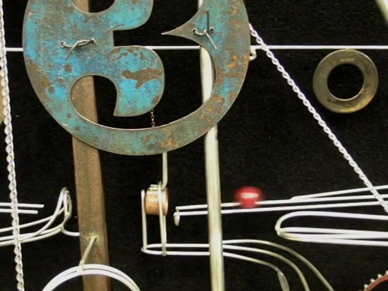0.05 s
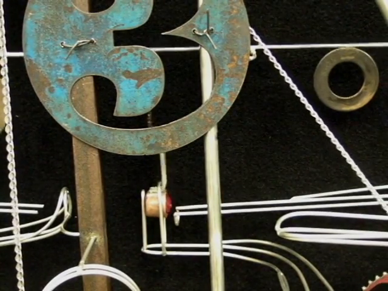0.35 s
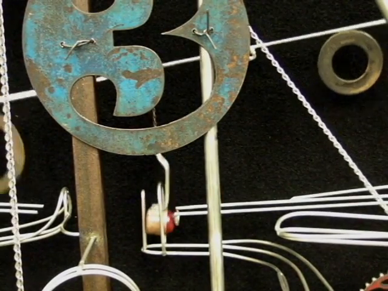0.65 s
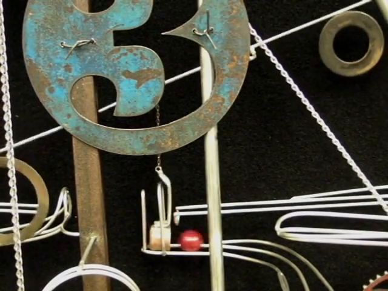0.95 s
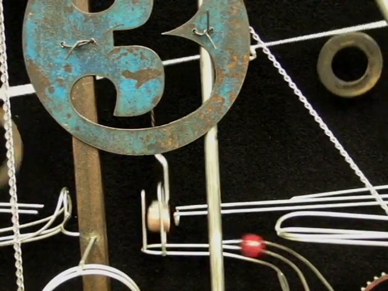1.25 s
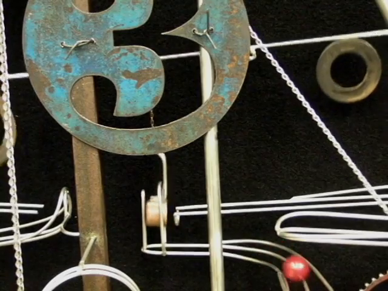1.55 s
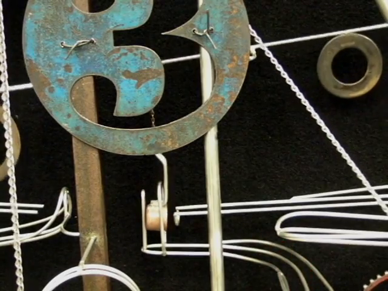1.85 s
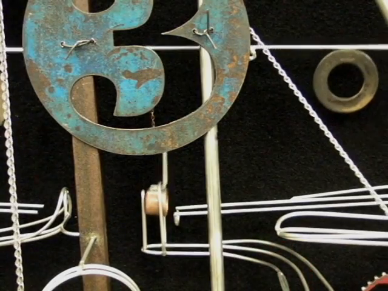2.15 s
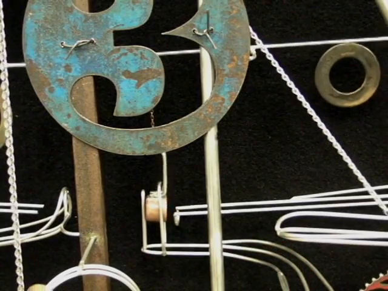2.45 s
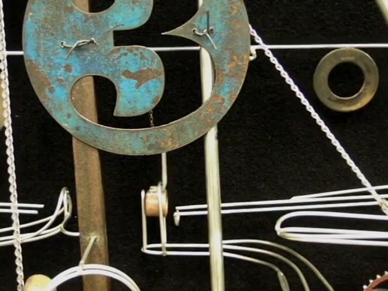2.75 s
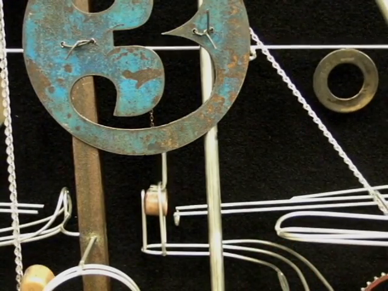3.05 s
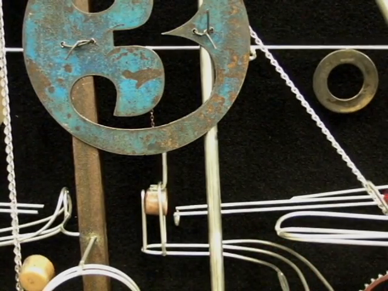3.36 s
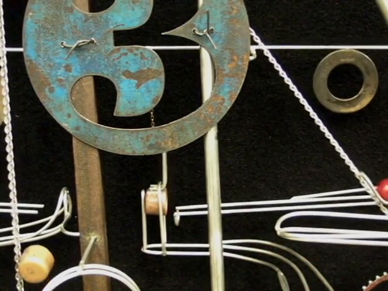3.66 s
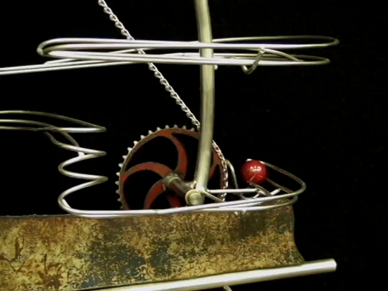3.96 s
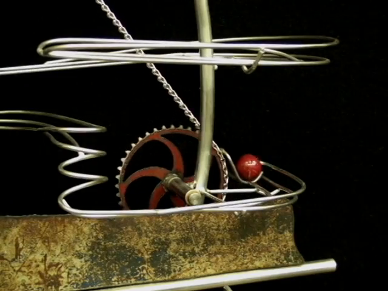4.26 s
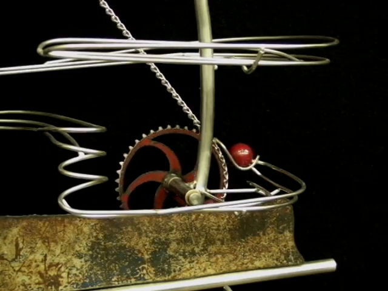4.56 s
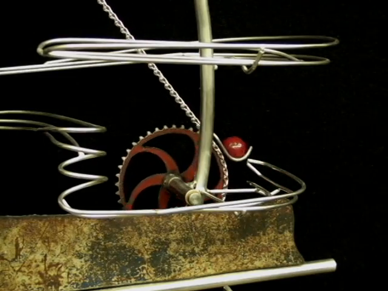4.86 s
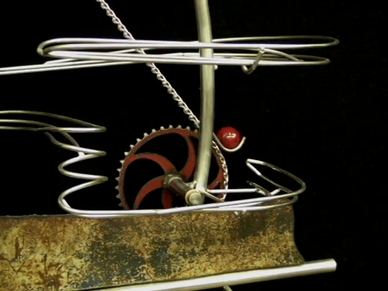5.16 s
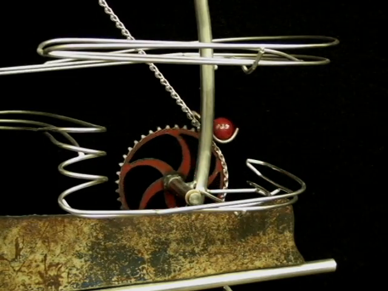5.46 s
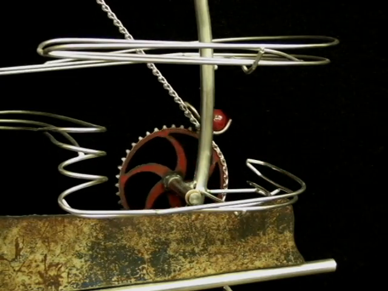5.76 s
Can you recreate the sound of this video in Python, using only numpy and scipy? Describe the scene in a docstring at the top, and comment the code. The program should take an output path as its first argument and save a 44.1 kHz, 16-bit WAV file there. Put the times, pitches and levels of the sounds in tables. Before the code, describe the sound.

From the start, balls roll along the welded wire rails of a sculpture, close to a stereo microphone indoors, making a continuous metallic rustle. Irregular knocks and rattles come several times a second, each chattering briefly and setting the frame ringing brightly. Sharp little clicks and wire clinks are mixed in, and a soft low growl swells as balls pass through bends. Stronger knocks fall near 0.6 seconds, in a busy cluster from 1.8 to 2.6, and again between 3.1 and 3.8.

At about 3.9 seconds the near tracks fall quiet, leaving softer rolling farther away. A chain lift adds light taps, clicks and short jangles at around 4.1, 4.7 and 5.1 seconds, with the clearest at 5.5. The distant rolling grows slightly toward the end, near 5.8 seconds. A faint, low motor hum and soft room tone run underneath throughout.

```python
"""Balls knock and rattle along the welded wire rails of a rolling-ball sculpture, indoors, close to a
stereo microphone. Each knock makes ball and rails chatter and sets the whole frame ringing; the ball
then rocks and rustles on until it settles. About four seconds in, the near tracks fall quiet and a
chain lift carries one ball up amid a few clicks and jangles, while others roll farther off.
A motor hums underneath, over soft room tone."""
import sys
import numpy as np
from scipy import signal
from scipy.fft import rfft, irfft, next_fast_len
from scipy.io import wavfile
from scipy.ndimage import uniform_filter1d

SR = 44100
rng = np.random.default_rng(int(sys.argv[2]) if len(sys.argv) > 2 else 0)


def master_out(mix):
    """Clip the mix to full scale and print it as 16-bit PCM to the path in sys.argv[1]."""
    frames = np.transpose(np.atleast_2d(mix))
    ceiling = np.clip(frames, -1, 1)
    pcm = np.round(ceiling * 32767).astype(np.int16)
    wavfile.write(sys.argv[1], SR, pcm)


N = 256220
TIME = np.arange(N) / SR

# Levels and gains are relative within each table.
# balls striking the rails by the microphone: start_s, level_db, chatter_s, tilt_db_per_octave
BALL_KNOCKS = [(0.059, -25, 0.021, 1), (0.334, -23.5, 0.052, 0.5), (0.374, -21.5, 0.13, 2),
               (0.6025, -18, 0.18, 1.5), (0.693, -22.5, 0.17, 3), (0.951, -18.5, 0.063, 1.5),
               (1.316, -23, 0.097, 1.5), (1.8097, -17, 0.15, 2.5), (1.892, -21, 0.33, 1),
               (2.176, -20.5, 0.017, 0), (2.35, -25, 0.035, 2), (2.3892, -18, 0.081, 0),
               (2.511, -25.5, 0.095, 1), (2.564, -20, 0.035, 0), (3.1462, -18.5, 0.16, 0),
               (3.338, -18.5, 0.14, 1), (3.51, -24.5, 0.053, 5), (3.7703, -17, 0.091, 0)]
# balls juddering between the rails without a blow: start_s, level_db, chatter_s, tilt_db_per_octave
BALL_RATTLES = [(0.425, -20.5, 0.09, -1), (0.457, -24, 0.25, 2), (0.822, -19.5, 0.061, 3),
                (1.153, -31, 0.038, -5.5), (1.244, -34.5, 0.23, -3.5), (1.449, -20, 0.048, 0.5),
                (1.63, -32, 0.11, -1.5), (2.044, -20, 0.17, 0.5), (2.302, -26, 0.12, -1),
                (2.71, -24, 0.045, 3), (2.818, -19.5, 0.15, 1), (3.045, -32.5, 0.16, 5),
                (3.474, -17, 0.056, -1.5), (3.675, -30, 0.13, -1)]
# jangles of the chain lift: start_s, level_db, chatter_s, tilt_db_per_octave
CHAIN_JANGLES = [(4.102, -26.5, 0.11, -8), (4.145, -26.5, 0.048, -4), (4.714, -33, 0.021, -4),
                 (5.061, -27.5, 0.07, -6), (5.074, -26, 0.08, -2.5), (5.476, -19.5, 0.051, -2.5)]
# dry clicks of balls and levers, clinks of single wires nearby: start_s, level_db, pitch_hz, t60_s
CLICKS_AND_CLINKS = [(0.3369, -8.5, 9800, 0.0039), (0.375, -8.5, 2900, 0.019), (0.376, -26, 10760, 0.2),
                     (0.6005, -11, 6000, .006), (0.832, -26.5, 3056, 0.4), (1.46, -23, 4020, .08),
                     (1.8142, -9, 5100, 0.029), (1.898, -17, 7050, 0.19), (2.0226, -4, 7900, 0.007),
                     (2.056, -5, 7240, 0.023), (2.065, -6.5, 2640, 0.0082), (2.5651, -10.5, 2870, 0.037),
                     (3.507, -11, 3170, 0.0052), (3.772, -9, 5600, .006), (4.1465, -5, 2600, 0.0053),
                     (4.7027, -19.5, 8500, 0.017), (4.719, -26, 5600, 0.011), (4.8863, -31, 8800, 0.02),
                     (5.48, -22, 10200, .03), (5.492, -30.5, 1700, 0.26), (5.569, -17, 4730, 0.012)]
# soft dry taps in the mechanism: start_s, level_db
SOFT_TAPS = [(1.7029, -33), (3.0359, -34), (4.3855, -31.5), (4.5863, -38), (4.903, -37.5), (5.0533, -36.5)]
# modes of the tapped part: pitch_hz, t60_s
TAPPED_PART_MODES = [(735, .022), (815, .036)]
# balls sweeping through bends: centre_s, level_db, half_length_s, strongest_mode_hz
BEND_PASSES = [(0.483, -40, 0.14, 444), (0.78, -43, 0.058, 420), (1.02, -42.5, 0.051, 567),
               (2.097, -40, 0.13, 411), (2.902, -36.5, 0.083, 424), (3.403, -42.5, 0.13, 420)]
# low modes of the curved rails: pitch_hz, level_db
CURVED_RAIL_MODES = [(273, -5), (368, -6), (418, -2), (555, -2)]
# steady rolling close by, louder on the slopes and fainter after each drop: time_s, level_db
NEAR_ROLL_LEVELS = [(0, -27.5), (.25, -33), (.8, -29.5), (1.1, -38), (1.55, -33.5), (2.1, -31.5), (3, -32),
                    (3.25, -27.5), (3.9, -35)]
# rolling farther off: time_s, level_db
FAR_ROLL_LEVELS = [(3.9, -39.5), (4.65, -42.5), (5.4, -35), (5.81, -34)]
# tones of the motor: pitch_hz, level_db
MOTOR_TONES = [(360.5, -62.5), (419.9, -62.5)]

# ring time of the frame: band_centre_hz, t60_s
FRAME_DECAY = [(400, 0.7), (2500, 0.34), (7000, 0.22), (13000, 0.16)]
# modes of the near frame; negative gains are dead gaps between them: pitch_hz, gain_db
NEAR_FRAME_MODES = [(418, 6), (1665, 9), (1892, 9), (2121, 8), (2277, 7), (2400, -5), (2514, 7), (3015, 5),
                    (3064, 8), (3115, 4), (3550, -5), (3765, 6), (3960, 5), (4260, -6), (4959, 5),
                    (5066, 5), (6476, 5), (7138, 7), (7289, 6), (7489, 7), (7652, 7), (8220, 6), (10309, 5)]
# modes and dead gaps of the far tracks and the lift: pitch_hz, gain_db
FAR_FRAME_MODES = [(418, 5), (1660, 6), (1905, 7), (2055, 6), (2130, 7), (2320, 7), (2410, -7), (3050, 8),
                   (3305, 7), (4180, 4), (4400, -6), (4575, 7), (4680, 5), (4850, -5), (12850, 8)]
# spectrum of a close knock: frequency_hz, gain_db
KNOCK_SPECTRUM = [(100, -36), (290, -26.5), (420, -18.5), (750, -20.5), (1450, -16.5), (1750, -6),
                  (3000, -3), (7500, 0), (10500, -4.5), (12000, -13), (14800, -12.5)]
# spectrum of close rolling: frequency_hz, gain_db
NEAR_ROLL_SPECTRUM = [(50, -38), (100, -23), (140, -5), (280, -19), (420, -9), (700, -10), (1450, -13.5),
                      (1750, -5), (3100, 2), (7500, 4), (10500, -4.5), (12000, -11.5), (15000, -18)]
# spectrum of the chain's jangle: frequency_hz, gain_db
JANGLE_SPECTRUM = [(100, -33), (650, -17.5), (1350, -23), (1700, -8), (5500, 9.5), (8500, 11.5), (12000, 3),
                   (14500, 5)]
# spectrum of distant rolling: frequency_hz, gain_db
FAR_ROLL_SPECTRUM = [(60, -31), (140, -2), (280, -23.5), (420, -8), (700, -7), (1400, -11.5), (1700, -2.5),
                     (3100, 1), (7500, 1), (10500, -12.5), (15000, -20)]
# spectrum of the room tone: frequency_hz, gain_db
ROOM_SPECTRUM = [(20, -55), (45, -11), (90, 6.5), (140, 8.5), (270, 3.5), (420, 5.5), (800, -1), (1400, -2),
                 (8000, -10.5), (15000, -34)]

# left-right likeness of knocks, jangles and click reflections: frequency_hz, correlation
CONTACT_COHERENCE = [(3000, 0.98), (4700, 0.8), (6500, 0.21), (12000, 0.052)]
# left-right likeness of close rolling: frequency_hz, correlation
NEAR_ROLL_COHERENCE = [(4000, 0.84), (6800, 0.048)]
# left-right likeness of the far tracks and the room: frequency_hz, correlation
FAR_COHERENCE = [(50, 0.99), (150, 0.67), (2400, 0.89), (4400, 1), (8000, 0.14)]
# balance of the microphone pair: frequency_hz, left_minus_right_db
MIC_BALANCE = [(2000, -0.3), (5800, -2), (7700, 9), (9500, 3.5), (14000, 3.5)]

NEAR_WIDTH_HZ, FAR_WIDTH_HZ, WIRE_WIDTH_HZ, GAP_WIDTH_HZ = 23, 32, 70, 130  # base widths of modes, gaps
LIFT_S, HANDOVER_S = 3.91, 0.075  # middle and length of the fade from near to far rolling


def knocks_and_rattles():
    """Close to the microphone, balls strike the rails or judder between them, and the frame rings."""
    knocks = clatter(BALL_KNOCKS, chatter_db=2.5, blow_db=28.0)
    rattles = clatter(BALL_RATTLES, chatter_db=4.5, rise_s=0.0034)
    return colour(knocks + rattles, KNOCK_SPECTRUM, NEAR_FRAME_MODES)


def clatter(events, chatter_db, blow_db=None, rise_s=None, clink_db=12.5, wire_count=3, size=32768):
    """Dying rebounds between a few wires, rung out by the frame; they start with a blow or build up."""
    out, hz, t = np.zeros((2, N)), freqs(size), TIME[:size // 2]
    whole_frame, shared_power = evened(frame_ring(CONTACT_COHERENCE)), 0.26
    octaves = np.log2(np.clip(hz, 1500, 12000) / 5500)
    # bending waves run faster at high pitch: treble arrives first, mids a few milliseconds later
    lag_s = .003 * (np.sqrt(9000 / np.clip(hz, 500, 9000)) - 1)
    dispersion = np.exp(-2j * np.pi * np.cumsum(lag_s) * SR / size)
    for start_s, level_db, chatter_s, tilt_db in events:
        rebound = np.maximum(1 - t / chatter_s, 0)  # a bouncing ball loses speed evenly
        landing, pressure = landings(t)
        force = undb(chatter_db) * impacts(len(t), per_s=900, spread_db=1.0) * rebound * pressure
        if rise_s:
            force = force * (1 - np.exp(-t / rise_s))
        if blow_db:
            force[0] = undb(blow_db)
        # every spot on the rails wakes partly the same modes and partly its own
        this_spot = frame_ring(CONTACT_COHERENCE)
        ring = np.sqrt(shared_power) * whole_frame + np.sqrt(1 - shared_power) * this_spot
        # the ball lands on each wire in turn, and each has 14 modes of its own: pitch_hz, gain_db
        wires = rng.uniform((5200, 2), (14000, clink_db), size=(wire_count, 14, 2))
        clinks = 0
        for k, modes in enumerate(wires):
            wire_force = force * (landing % wire_count == k)
            clinks = clinks + rfft(wire_force, size) * unit(resonances(hz, modes, WIRE_WIDTH_HZ))
        gain = undb(level_db + tilt_db * octaves)
        add(out, start_s, irfft(clinks * rfft(ring, size) * gain * dispersion))
    return out


def landings(t, bounce_s=.016, contact_s=.004):
    """A ball lands at uneven intervals: which landing each moment belongs to, and how hard it presses."""
    landing_s = np.r_[0, np.cumsum(rng.uniform(.5, 2, size=64)) * bounce_s]
    landing = np.searchsorted(landing_s, t, side="right") - 1
    pressure = unit(.5 + np.exp(-(t - landing_s[landing]) / contact_s))
    return landing, pressure


def impacts(size, per_s, spread_db):
    """Tiny random contacts of uneven strength, rms 1."""
    strength = undb(spread_db * np.clip(rng.standard_normal(size), -2, 2))
    direction = rng.choice([-1, 1], size)
    touching = rng.random(size) < per_s / SR
    return unit(strength * direction * touching)


def frame_ring(coherence, strike_db=-5, spread_s=0.0094, size=16384):
    """The countless weak modes of the frame as fading noise; the treble dies first."""
    noise, t, ring = rfft(stereo_noise(size, coherence)), TIME[:size], 0
    centres_hz, t60s = np.transpose(FRAME_DECAY)
    for t60_s, weights in zip(t60s, np.eye(len(FRAME_DECAY))):
        band = irfft(noise * log_interp(np.c_[centres_hz, weights], freqs(size)))
        ring = ring + band * decay(t, t60_s)
    # a contact is sharpest before it has spread through the frame
    ring = ring * (1 + undb(strike_db) * np.exp(-t / spread_s))
    return ring / np.sqrt(np.sum(ring ** 2) / 2)


def evened(ring, width_hz=60):
    """Smooth the spectrum of a ring, so that the frame's strong modes stand out clearly on it."""
    size = 2 * ring.shape[1]
    spectrum = rfft(ring, size)
    power = uniform_filter1d(np.mean(np.abs(spectrum) ** 2, axis=0), int(width_hz * size / SR) + 1)
    slope = unit(np.sqrt(log_interp(FRAME_DECAY, freqs(size))))  # longer ringing holds more energy
    return irfft(spectrum / np.sqrt(power) * slope)[:, :size // 2]


def near_rolling(rock_db=-5, rock_peak_s=0.068):
    """Balls roll past the microphone; the rustle swells while one rocks with the energy of a knock."""
    power = undb(np.interp(TIME, *np.transpose(NEAR_ROLL_LEVELS))) ** 2
    for start_s, level_db, chatter_s, _ in BALL_KNOCKS:
        age = np.maximum(TIME - start_s, 0) / rock_peak_s
        swell = age ** 2 * np.exp(1 - age ** 2)
        power = power + undb(level_db + rock_db) ** 2 * chatter_s * swell
    rustle = rolling(np.sqrt(power) * near_share(), NEAR_ROLL_COHERENCE)
    return undb(4.0) * colour(rustle, NEAR_ROLL_SPECTRUM, NEAR_FRAME_MODES)


def rolling(strength, coherence):
    """Balls bump over the grain of the wire and keep the frame rustling."""
    ring = evened(frame_ring(coherence))
    strength = np.pad(strength, (ring.shape[1] - 1, 0), mode="edge")  # already under way at the start
    force = impacts(len(strength), per_s=420, spread_db=3.5) * strength
    return signal.fftconvolve(force[None], ring, mode="valid", axes=1)


def near_share():
    """Share of the near tracks in the rolling: 1 at first, 0 once the lift takes over."""
    return np.clip(.5 + (LIFT_S - TIME) / HANDOVER_S, 0, 1)


def bends(waver_hz=13):
    """Pressed into a curve, a ball growls and makes the rails' low modes hum, one above the rest."""
    hum = unit(sum(undb(db) * noise_tone(hz, waver_hz) for hz, db in CURVED_RAIL_MODES))
    growl = undb(-11.5) * noise_tone(pitch_hz=420, width_hz=370)
    out = np.zeros(N)
    for centre_s, level_db, half_length_s, strongest_hz in BEND_PASSES:
        swell = np.exp(-((TIME - centre_s) / half_length_s) ** 2)
        out += undb(level_db) * swell * unit(hum + growl + noise_tone(strongest_hz, waver_hz))
    return out


def clicks_and_taps(tap_cutoff_hz=1100):
    """Balls and levers click, single wires clink, and soft contacts tap with little treble."""
    out = np.zeros((2, N))
    for start_s, level_db, pitch_hz, t60_s in CLICKS_AND_CLINKS:
        add(out, start_s, undb(level_db) * ping(pitch_hz, t60_s, echo_db=-8, echo_t60_s=0.19))
    soft_contact = signal.butter(2, tap_cutoff_hz, fs=SR)
    for start_s, level_db in SOFT_TAPS:
        tap = sum(ping(hz, t60_s, echo_db=-7, echo_t60_s=0.1) for hz, t60_s in TAPPED_PART_MODES)
        add(out, start_s, undb(level_db) * signal.lfilter(*soft_contact, tap))
    return out


def ping(pitch_hz, t60_s, echo_db, echo_t60_s, size=16384):
    """One damped mode of a small part, with a short spray of reflections around its pitch."""
    t = TIME[:size]
    direct = np.sin(2 * np.pi * pitch_hz * t) * decay(t, t60_s)
    spray = stereo_noise(size, CONTACT_COHERENCE) * decay(t, echo_t60_s)
    echo = signal.lfilter(*signal.iirpeak(pitch_hz, Q=2, fs=SR), spray)
    # small parts radiate no bass
    low_cut = signal.butter(2, pitch_hz * 2 / 3, btype="high", fs=SR, output="sos")
    return signal.sosfilt(low_cut, direct + undb(echo_db) * unit(echo) * np.std(direct))


def chain_lift():
    """The chain jangles in short bursts as it carries a ball up."""
    jangles = clatter(CHAIN_JANGLES, chatter_db=6.5, rise_s=0.0013, clink_db=7)
    return colour(jangles, JANGLE_SPECTRUM, FAR_FRAME_MODES, FAR_WIDTH_HZ) * panned(-1.2)[:, None]


def far_rolling():
    """Balls rustle along the tracks farther from the microphone once the near ones fall quiet."""
    level_db = 0.5 + np.interp(TIME, *np.transpose(FAR_ROLL_LEVELS))
    rustle = rolling(undb(level_db) * (1 - near_share()), FAR_COHERENCE)
    return colour(rustle, FAR_ROLL_SPECTRUM, FAR_FRAME_MODES, FAR_WIDTH_HZ)


def motor_hum():
    """The motor keeps two low, wavering tones sounding."""
    return sum(undb(db) * noise_tone(hz, width_hz=3) for hz, db in MOTOR_TONES)


def room_tone():
    """The soft, low noise of the room."""
    return undb(-52.0) * colour(stereo_noise(N, FAR_COHERENCE), ROOM_SPECTRUM)


def noise_tone(pitch_hz, width_hz):
    """A resonance kept sounding by a ball or the motor, rms 1: wavering if narrow, a growl if wide."""
    band = 1 / (1 + ((freqs(N) - pitch_hz) / width_hz) ** 4)
    return unit(irfft(band * rfft(rng.standard_normal(N)), N))


def resonances(hz, modes, width_hz, q=500):
    """Response of narrow resonances and wider gaps in a flat spectrum; higher modes die sooner."""
    response = 1
    for pitch_hz, gain_db in modes:
        bandwidth_hz = width_hz + pitch_hz / q if gain_db > 0 else GAP_WIDTH_HZ
        response = response + (undb(gain_db) - 1) / (1 + 2j * (hz - pitch_hz) / bandwidth_hz)
    return response


def colour(x, spectrum, modes=(), width_hz=NEAR_WIDTH_HZ):
    """Causal filter of unit power gain: a broad spectrum with narrow resonances on top."""
    size = 2 * next_fast_len(N // 2 + SR // 4)
    cepstrum = irfft(np.log(undb(log_interp(spectrum, freqs(size)))))
    cepstrum[1:size // 2] *= 2  # folding the cepstrum gives minimum phase
    cepstrum[size // 2 + 1:] = 0
    response = np.exp(rfft(cepstrum)) * resonances(freqs(size), modes, width_hz)
    return irfft(rfft(x, size) * unit(response))[..., :N]


def stereo_noise(size, coherence):
    """White noise with a given left-right correlation at each frequency."""
    alike = log_interp(coherence, freqs(size))
    mid, side = rfft(rng.standard_normal((2, size))) * np.sqrt([(1 + alike) / 2, (1 - alike) / 2])
    return irfft(np.array([mid + side, mid - side]), size)


def left_first(x, lead_s):
    """Sound from one side reaches the left microphone before the right."""
    half_phase = np.pi * freqs(N) * lead_s
    return irfft(rfft(x) * np.exp(1j * np.array([half_phase, -half_phase])), N)


def panned(db):
    """Left and right gains for a level difference, left minus right."""
    return undb(np.array([db, -db]) / 2)


def add(out, start_s, x):
    """Mix a sound in at its start time."""
    start = int(start_s * SR)
    out[:, start:start + x.shape[-1]] += x[..., :N - start]


def decay(t, t60_s):
    """Exponential fade, 60 dB down at t60_s."""
    return np.exp(-np.log(1000) * t / t60_s)


def log_interp(points, hz):
    """Join (frequency_hz, value) points by straight lines on a log-frequency axis."""
    points_hz, values = np.transpose(points)
    return np.interp(np.log(hz + 1e-9), np.log(points_hz), values)


def freqs(size):
    """Frequencies of the bins of a real transform."""
    return np.arange(size // 2 + 1) * SR / size


def undb(db):
    """Decibels to gain."""
    return 10 ** (np.asarray(db) / 20)


def unit(x):
    """Scale to rms 1."""
    return x / np.sqrt(np.mean(np.abs(x) ** 2))


def scene():
    """The sculpture in its room: rails up close, the lift and far tracks off to one side."""
    near = knocks_and_rattles() + near_rolling()
    far = left_first(chain_lift() + far_rolling(), lead_s=.00004)
    return near + far + bends() + clicks_and_taps() + motor_hum() + room_tone()


def record(dry):
    """The left microphone is brighter; the treble has a narrow, steady dip near 7.9 kHz and no top."""
    dip_hz, dip_width_hz, top_hz = 7900, 320, 15200
    at_mics = irfft(rfft(dry) * panned(log_interp(MIC_BALANCE, freqs(N))), N)
    dipped = signal.lfilter(*signal.iirnotch(dip_hz, dip_hz / dip_width_hz, fs=SR), at_mics)
    return signal.sosfilt(signal.ellip(8, .2, 70, top_hz, fs=SR, output="sos"), dipped)


dry = scene()
out = record(dry)
master_out(out)
```